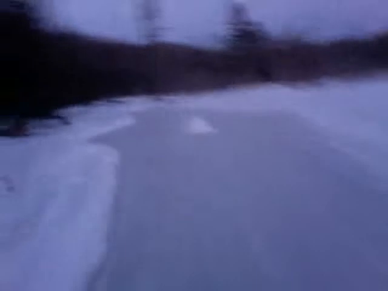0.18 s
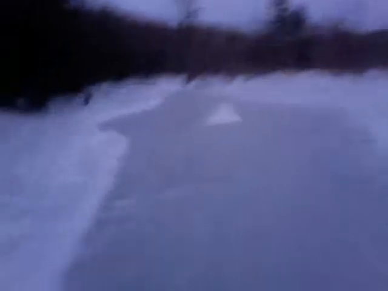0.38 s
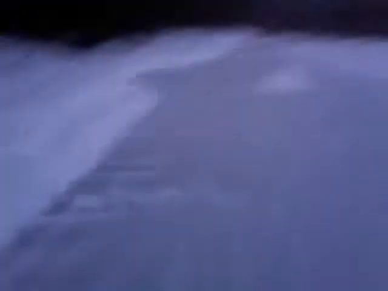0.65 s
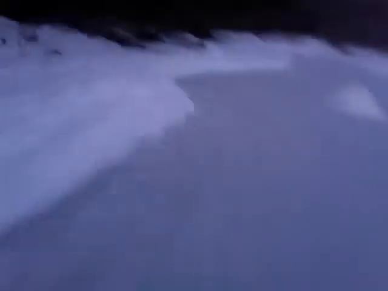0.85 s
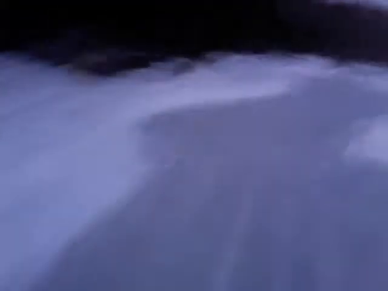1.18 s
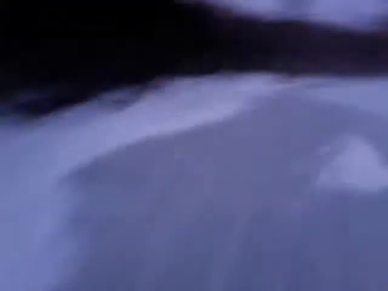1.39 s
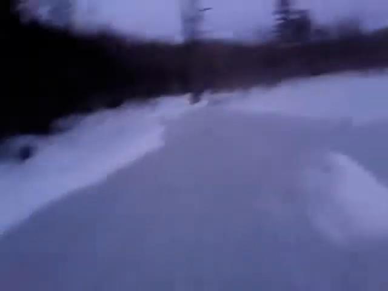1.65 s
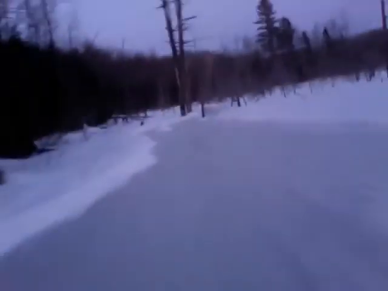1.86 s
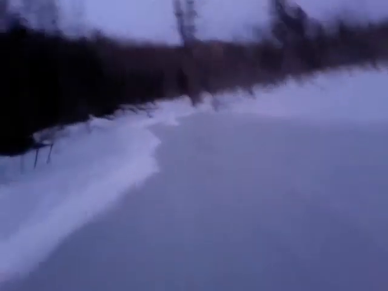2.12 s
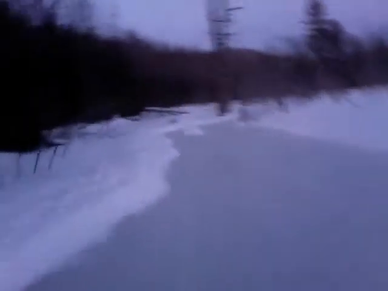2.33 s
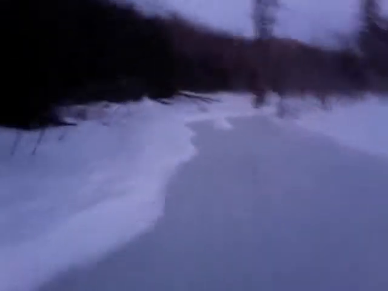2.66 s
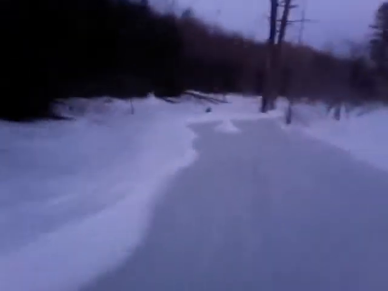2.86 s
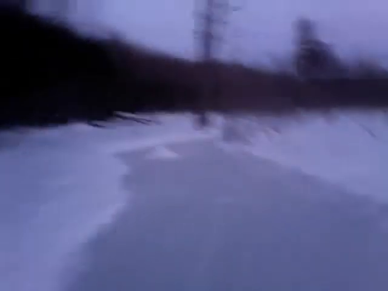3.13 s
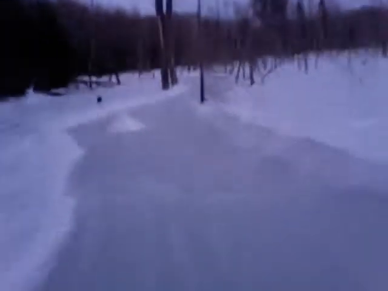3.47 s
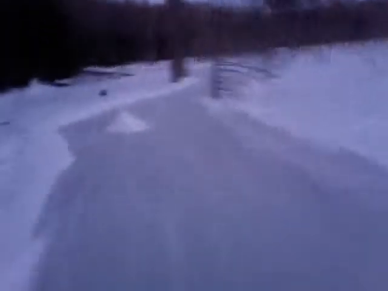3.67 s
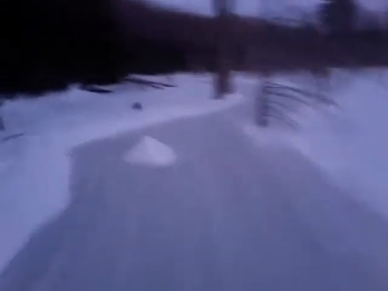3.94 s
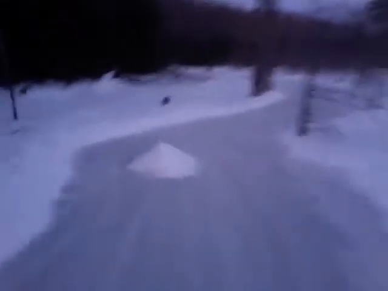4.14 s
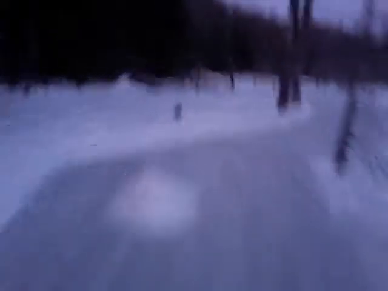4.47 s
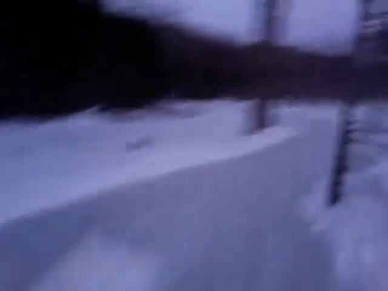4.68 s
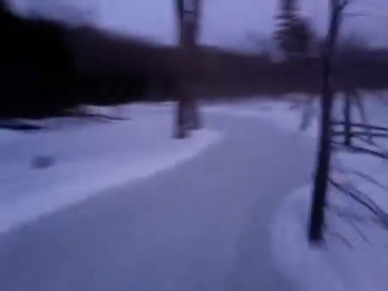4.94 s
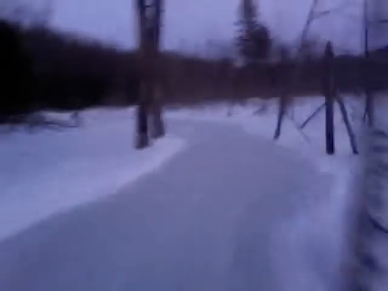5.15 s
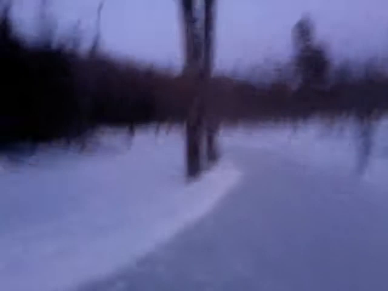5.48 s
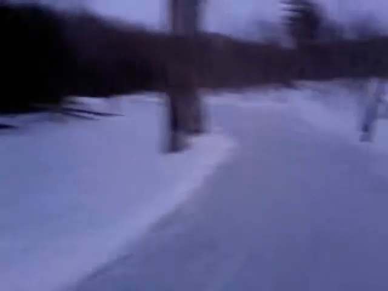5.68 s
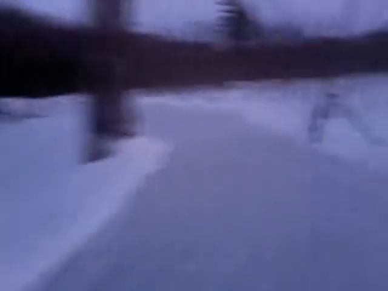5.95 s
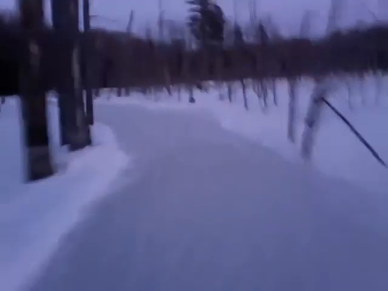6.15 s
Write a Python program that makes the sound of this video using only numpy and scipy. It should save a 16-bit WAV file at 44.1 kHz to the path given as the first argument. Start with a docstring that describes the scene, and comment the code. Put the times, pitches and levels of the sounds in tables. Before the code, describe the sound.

Close, irregular skating strokes grind across bumpy outdoor ice, knocking, crunching and briefly groaning above a thin hiss of loose snow.

```python
"""Rough, snow-dusted pond ice in open air: a skater, close by, on a camera's small microphone.
The blades stick and slip in a dense chatter that each stroke swells or eases, and catch on bumps in short, dry knocks.
Each contact filters noise bursts into a dull, falling thud, a hollow ring mostly at 700-900 Hz,
a crunch of breaking ice and a thin spray of snow. Now and then a juddering edge groans as a pulsing tone,
or a scrape sings in a narrow band. Loose snow hisses evenly below, over a faint hush.
"""
import sys
import numpy as np
from scipy import signal
from scipy.fft import rfft, irfft, next_fast_len
from scipy.io import wavfile
from scipy.ndimage import uniform_filter1d, map_coordinates

SR = 44100
rng = np.random.default_rng(int(sys.argv[2]) if len(sys.argv) > 2 else 0)


def transcribe(signal):
    """Save signal, clipped to [-1, 1], as a 16-bit WAV file at the path in sys.argv[1]."""
    frames = np.atleast_2d(signal).T
    limited = np.clip(frames, -1, 1)
    pcm = np.round(limited * 32767).astype(np.int16)
    wavfile.write(sys.argv[1], SR, pcm)


N = 278271
TIME = np.arange(N) / SR  # t/s


def amp(db):
    """Decibels to gain."""
    return 10 ** (np.asarray(db) / 20)


def unit(x):
    """x at rms 1."""
    return x / np.sqrt(np.mean(x ** 2) + 1e-20)


def steady(x, span):
    """x with its slow level (over span seconds) evened out to rms 1."""
    size = int(span * SR) + 1
    slow_power = uniform_filter1d(uniform_filter1d(x * x, size), size)
    return x / np.sqrt(np.abs(slow_power) + 1e-12)


def response(spectrum, size=2048):
    """The causal, minimum-phase impulse response with this (f/Hz, level/dB) colour."""
    hz, db = np.transpose(spectrum)
    bins_hz = np.fft.rfftfreq(size, 1 / SR)
    gain = amp(np.interp(np.log(bins_hz + 1), np.log(hz), db))
    # folding the cepstrum forward in time puts the energy as early as possible
    cepstrum = irfft(np.log(gain))
    cepstrum[1:size // 2] *= 2
    cepstrum[size // 2 + 1:] = 0
    return irfft(np.exp(rfft(cepstrum)))


def through(x, impulse):
    """x played through an impulse response."""
    return signal.fftconvolve(x, impulse)[:len(x)]


def resonate(x, hz, width_hz):
    """x rings a resonance whose centre may move."""
    t = TIME[:SR // 40]
    carrier = np.exp(2j * np.pi * np.cumsum(hz * np.ones(len(x))) / SR)
    # shift the centre down to 0 Hz, ring there, and shift back up
    ringing = through(x / carrier, t * np.exp(-np.pi * width_hz * t))
    return np.real(carrier * ringing)


def add(track, s, sound):
    """Mix a sound into the track at time s."""
    start = int(np.clip(s * SR, 0, N - 1))
    track[start:start + len(sound)] += sound[:N - start]


def wobble(per_s):
    """A smooth random curve with this many knots a second."""
    return map_coordinates(rng.standard_normal(size=2048), [TIME * per_s], mode="mirror")


def slips(rate, scatter, spread_db, count=2500):
    """Stick and slip: pulses of uneven size at an uneven rate, per second."""
    gap, size = rng.standard_normal((2, count))
    at = (np.cumsum(np.exp(scatter * gap)) / rate * SR).astype(int)
    gains = amp(spread_db * np.clip(size, -2, 2))
    inside = at < N
    return np.bincount(at[inside], gains[inside], N)


def fragments(per_s, spread_db):
    """Ice breaks grain by grain: single snaps of uneven size at random moments."""
    snaps = (rng.random(N) < per_s / SR) * rng.choice([-1, 1], N)
    return unit(snaps * amp(spread_db * np.clip(rng.standard_normal(N), -2, 2)))


def shedding(pulses, life, rub):
    """Each slip sheds a sudden burst that dies over its life (s), over a share of even rubbing."""
    return unit(through(pulses, np.exp(-TIME[:SR // 20] / life))) + rub


def crumble(pulses, life, rub, grains_per_s):
    """The shedding of the slips sets how strongly the ice snaps."""
    return fragments(grains_per_s, spread_db=3.0) * shedding(pulses, life, rub)


def pings(pulses, life, rub, low_hz, high_hz, decay, count):
    """Every shed fragment pings at a pitch of its own and dies away over the decay time (s)."""
    strength = shedding(pulses, life, rub)
    when, pitch, size, phase = rng.random((count, 4)).T[:, :, None]
    at, t = (when * N).astype(int), TIME[:SR // 220]
    hz = low_hz + (high_hz - low_hz) * pitch
    tones = np.exp(-t / decay) * np.sin(2 * np.pi * (hz * t + phase))
    grains = strength[at] * amp(8.8 * size) * tones
    return unit(np.bincount((at + np.arange(len(t))).ravel(), grains.ravel(), N)[:N])


def shifting(x, patchy_db):
    """Resonances come and go as the contact point moves along the blade."""
    z = signal.stft(x, nperseg=512)[2]
    field = rng.standard_normal(z.shape)
    for _ in range(2):
        field = uniform_filter1d(uniform_filter1d(field, size=4, axis=0), size=8, axis=1)
    return signal.istft(z * amp(patchy_db * unit(field)), nperseg=512)[1][:N]


# the ice sheet carries low notes more slowly: travel time (s) at this pitch (Hz)
ICE_TRAVEL_S, ICE_HZ = .003, 338


def disperse(x):
    """Bending waves in the ice run faster with the root of frequency, so a thud falls in pitch."""
    size = next_fast_len(N + SR // 2)
    hz = np.fft.rfftfreq(size, 1 / SR)
    # delay counted from the arrival at ICE_HZ: lower notes later, higher ones sooner
    cycles = ICE_TRAVEL_S * (2 * np.sqrt(ICE_HZ * hz) - hz - ICE_HZ)
    return irfft(rfft(x, size) * np.exp(-2j * np.pi * cycles), size)[:N]


# pushes and scrapes of a blade: (start t/s, end t/s, swell from start to end level/dB, ring f/Hz,
# thud level/dB, ring level/dB, crunch level/dB, spray level/dB)
STROKES = [(0, 0.207, -1.5, 718, -44, -42, -51, -59.5), (0.446, 0.536, -2, 780, -61, -62, -72, -58),
           (0.711, 0.857, 2, 747, -54, -44, -55, -63.5), (0.885, 0.977, 0.5, 825, -50, -29, -43.5, -60.5),
           (0.974, 1.121, -2.5, 880, -47, -33.5, -42, -59),
           (1.216, 1.502, -1.5, 710, -44.5, -41.5, -49, -84),
           (1.557, 1.724, 12.5, 857, -43.5, -35.5, -50.5, -64),
           (1.788, 2.032, 4, 658, -57, -40.5, -47.5, -57.5), (2.577, 2.701, 7, 755, -39, -39.5, -51.5, -80),
           (2.74, 3.075, -1, 850, -48.5, -53.5, -57, -70), (3.368, 3.579, 11.5, 790, -50, -42, -64, -65),
           (3.68, 3.786, 7, 860, -54, -50.5, -58, -80), (4.226, 4.347, 0, 870, -51, -41, -72, -68),
           (4.36, 4.589, -3, 770, -37.5, -39.5, -42.5, -53), (4.833, 4.929, 14, 900, -49, -51, -56, -78),
           (5.025, 5.143, -5.5, 870, -37.5, -33.5, -47.5, -57),
           (5.197, 5.343, 0.5, 880, -47, -44, -51, -57.5), (5.52, 5.708, 9, 846, -40, -41, -50, -56),
           (5.922, 6.006, 2, 855, -35, -29, -51.5, -54.5), (6.035, 6.127, 1, 854, -44, -37, -42, -55.5)]
# how strongly the blades coast between strokes: (t/s, level/dB on top of the coasting levels)
COAST = [(0, 5), (1.2, 12), (2.1, 9), (2.4, 6.5), (2.9, 8), (3.25, 1.5), (3.8, 9), (4.1, 2.5), (4.75, 9.5),
         (5.4, 5.5), (6.2, 7.5), (6.3, 8)]
# base levels of coasting: (thud level/dB, ring level/dB, crunch level/dB, spray level/dB)
COAST_LEVELS = (-58, -57.5, -64, -74)
STROKE_ATTACK_S, STROKE_RELEASE_S = 0.013, 0.038


def pressure():
    """Levels (dB) of the four parts: each stroke bites, swells or eases, and lifts, over the coasting."""
    coast_db = np.interp(TIME, *np.transpose(COAST))
    power = amp(np.array(COAST_LEVELS)[:, None] + coast_db) ** 2
    for start, end, swell_db, _, *levels in STROKES:
        corners = [start - STROKE_ATTACK_S, start, end, end + STROKE_RELEASE_S]
        gate = np.interp(TIME, corners, [0, 1, 1, 0])
        on = gate > 0
        swell = amp(swell_db * np.interp(TIME[on], [start, end], [-.5, .5]))
        power[:, on] += (amp(levels)[:, None] * gate[on] * swell) ** 2
    return 10 * np.log10(power)


RING_WANDER_HZ, WANDER_PER_S = 40, 12  # scale of the wander, and its knots a second


def ring_pitch():
    """Each stroke has its own hollow ring, which wanders as the load on the blade shifts."""
    start, end, _, hz, *_ = np.transpose(STROKES)
    return np.interp(TIME, (start + end) / 2, hz) + RING_WANDER_HZ * wobble(WANDER_PER_S)


# colour of a contact's dull thud: (f/Hz, level/dB per Hz)
THUD_COLOUR = [(25, -52.5), (50, -55.5), (80, -18.5), (130, -5), (240, 2.5), (330, 2.5), (450, 4.5),
               (560, -7), (750, -42), (1500, -24.5), (4000, -71.5)]
KNOCKS_PER_S, KNOCK_SOFT_S = 36, 0.00076  # soft knocks of the uneven ice, and their decay
THUD_GRIT = 2.6  # grit that pressure adds, against the knocks


def glide_thud(pulses, rub):
    """Uneven ice knocks softly from below, and pressure grinds grit into the same dull body."""
    knocks = slips(rate=KNOCKS_PER_S, scatter=.35, spread_db=7)
    knocks = through(knocks, np.exp(-TIME[:SR // 100] / KNOCK_SOFT_S))
    grit = crumble(pulses, life=0.0065, rub=.5 * rub, grains_per_s=4000)
    body = response(THUD_COLOUR)
    return disperse(unit(through(knocks, body)) + THUD_GRIT * rub * unit(through(grit, body)))


# colour of a contact's hollow ring: (f/Hz, level/dB per Hz)
RING_COLOUR = [(100, -27), (420, 4), (540, -5), (640, 3), (880, 5), (1060, 7.5), (1230, 2), (1450, 2.5),
               (2000, -20.5), (5000, -37), (15000, -95)]
RING_LIFE_S = 0.0077  # decay of a slip's burst
RING_BROADENS = 0.62  # a pressed blade roars on both sides of its ring


def glide_ring(pulses, rub, hopping_hz):
    """The slips ring the hollow resonance, and pressure adds a broad roar around it."""
    chatter = crumble(pulses, life=RING_LIFE_S, rub=1.14 * rub, grains_per_s=3000)
    hollow = resonate(shifting(chatter, patchy_db=4.5), hopping_hz, width_hz=290)
    roar = crumble(pulses, life=RING_LIFE_S, rub=2 * rub, grains_per_s=3000)
    body = response(RING_COLOUR)
    return unit(through(hollow, body)) + RING_BROADENS * rub * unit(through(roar, body))


# colour of a contact's breaking ice: (f/Hz, level/dB per Hz)
CRUNCH_COLOUR = [(300, -52), (900, 0), (1350, 8.5), (1850, 8.5), (2200, 2), (2900, 3), (3700, -7),
                 (4500, -24), (5300, -26), (8000, -57)]


def glide_crunch(pulses, rub):
    """Each slip breaks off ice fragments that ping from 900 to 4600 Hz."""
    chips = pings(pulses, life=0.0071, rub=.6 * rub + 0.17, low_hz=900, high_hz=4600, decay=.0007, count=14000)
    return through(shifting(chips, patchy_db=3.5), response(CRUNCH_COLOUR))


# colour of a contact's thrown snow: (f/Hz, level/dB per Hz)
SPRAY_COLOUR = [(1500, -29), (4000, 3.5), (5000, 1), (6200, -3.5), (7600, -5), (9300, -10.5),
                (10500, -14.5), (12000, -18.5), (15500, -51)]


def glide_spray(pulses, rub):
    """Each slip throws snow crystals that ping from 2800 to 15000 Hz."""
    flakes = pings(pulses, life=0.0075, rub=.5 * rub + 0.17, low_hz=2800, high_hz=15000, decay=.0006, count=24000)
    return through(shifting(flakes, patchy_db=5), response(SPRAY_COLOUR))


# ring level (dB) at which the rub share reaches 1, and its growth in dB per dB of ring
FULL_RUB_DB, RUB_GROWTH = -22, 0.45
RING_HOP_HZ = 74  # the ring jumps by about this much from slip to slip


def glide(pulses, levels, ring_hz):
    """The chatter of the running blades drives all four parts, as hard as the stroke presses."""
    thud_db, ring_db, crunch_db, spray_db = levels
    # a light blade ticks; a pressed blade scrapes without a pause
    rub = np.minimum(amp(RUB_GROWTH * (ring_db - FULL_RUB_DB)), 1.2)
    # every firm slip lands on a new spot, with a slightly different ring
    hop_hz = RING_HOP_HZ * rng.standard_normal(N)[np.cumsum(pulses > .5)]
    thud = amp(thud_db) * steady(glide_thud(pulses, rub), 0.036)
    ring = amp(ring_db) * steady(glide_ring(pulses, rub, ring_hz + hop_hz), 0.034)
    crunch = amp(crunch_db) * steady(glide_crunch(pulses, rub), 0.031)
    spray = amp(spray_db) * steady(glide_spray(pulses, rub), 0.055)
    return thud + ring + crunch + spray


# a scraping edge sings or groans in a narrow, drifting band:
# (start t/s, end t/s, first f/Hz, last f/Hz, level/dB); none is shorter than 0.01 s
SINGS = [(0, 0.19, 8800, 8800, -66), (0, 0.23, 2490, 2580, -53), (.1, 0.253, 11200, 10600, -70),
         (0.42, 0.53, 5840, 5750, -61), (0.658, 0.664, 5850, 5630, -45), (0.835, 0.856, 7640, 7200, -49.5),
         (.89, 0.977, 623, 660, -30.5), (1.25, 1.317, 5200, 5070, -55), (1.628, 1.656, 7960, 7560, -53.5),
         (2.344, 2.52, 1830, 1650, -51), (2.504, 2.716, 1770, 1700, -40.5), (2.556, 2.62, 6940, 6560, -58),
         (2.768, 2.879, 3330, 3400, -52.5), (2.982, 3.133, 2700, 3620, -55.5),
         (3.517, 3.577, 6800, 7000, -60), (3.836, 3.88, 177, 175, -38.5), (3.948, 4.01, 9200, 8800, -68),
         (4.293, 4.372, 7260, 7440, -63.5), (4.372, 4.464, 3300, 3650, -56), (4.39, 4.583, 2580, 2800, -70),
         (5.02, 5.16, 3700, 3770, -52.5), (5.024, 5.156, 7960, 8300, -62), (5.92, 6.05, 2700, 2550, -62),
         (5.953, 6.173, 4900, 4820, -54), (6.163, 6.2, 9250, 8750, -58)]


def singing(pulses):
    """For part of a stroke the chatter feeds one resonance of blade or ice."""
    track = np.zeros(N)
    friction = crumble(pulses, life=0.0025, rub=0.18, grains_per_s=6700)
    for start, end, first_hz, last_hz, db in SINGS:
        scrape = friction[int(max(start, 0) * SR):][:int(max(end - start, .01) * SR)]
        width_hz = min(60 + .15 * first_hz, 400)
        tone = resonate(scrape, np.linspace(first_hz, last_hz, len(scrape)), width_hz)
        add(track, start, amp(db) * steady(tone, 0.033) * signal.windows.tukey(len(tone), .3))
    return track


# colour of the even hiss of loose snow: (f/Hz, level/dB per Hz)
POWDER_COLOUR = [(1500, 2), (4000, -4), (6000, -4.5), (8000, -14), (10000, -22), (15000, -24)]
POWDER_DB, POWDER_FOLLOWS = -72, 0.9  # base level, and dB gained per dB of coasting


def powder():
    """Loose snow hisses evenly under the running blades, between the strokes too."""
    hiss = unit(through(rng.standard_normal(N), response(POWDER_COLOUR)))
    return hiss * amp(POWDER_DB + POWDER_FOLLOWS * np.interp(TIME, *np.transpose(COAST)))


def open_air():
    """Filtered noise lies under everything as a faint, mostly low hush."""
    colour = [(25, -4.5), (200, 20.5), (900, -2.5), (3000, 0.5), (9000, -29.5), (15000, -65)]  # f/Hz, level/dB
    return amp(-57) * unit(through(rng.standard_normal(N), response(colour)))


# the edge catches on a bump, levels as rms over 10 ms before the closing filters:
# (t/s, contact length/s, at least 0.001, chip f/Hz, thud level/dB, ring level/dB, crunch level/dB)
CATCHES = [(.008, 0.0026, 2610, -39.5, -37, -43), (.025, 0.01, 2600, -50, -38, -44.5),
           (.052, 0.018, 1820, -33.5, -29.5, -45), (.087, 0.0061, 1820, -32.5, -44, -43),
           (.175, 0.0099, 2640, -38.5, -33, -40), (.294, 0.0041, 1800, -45.5, -63, -62),
           (.395, 0.0032, 2600, -41, -67, -50), (.43, .003, 2320, -42, -57, -52),
           (.457, 0.0023, 5800, -38.5, -57, -49), (.661, 0.0041, 3100, -37, -30.5, -40.5),
           (.689, 0.012, 1350, -65, -26, -41), (.719, 0.0031, 1800, -58, -32, -39.5),
           (.731, 0.0049, 2440, -66, -33, -39), (.75, 0.0092, 2540, -57, -28.5, -45),
           (.782, 0.013, 1770, -67, -29, -39.5), (.841, 0.012, 1350, -39, -21.5, -34.5),
           (.797, 0.0026, 2320, -54, -34, -45), (.822, 0.018, 2600, -43, -27, -55),
           (.883, 0.0061, 1900, -49, -39, -37.5), (.9, .003, 1500, -48, -36, -53),
           (.919, 0.0033, 1900, -44, -36, -46), (.942, 0.0033, 1450, -45, -39, -35),
           (.96, 0.003, 1940, -48, -33, -35.5), (.985, .003, 1360, -46, -35, -40),
           (1.001, 0.0045, 3120, -53, -33, -41), (1.034, 0.0038, 3900, -51, -25, -43),
           (1.054, 0.0026, 1400, -42, -32, -46), (1.112, 0.0023, 1870, -42, -30, -42),
           (1.085, 0.0021, 2000, -35, -32, -34.5), (1.094, 0.0091, 2000, -34.5, -34, -36.5),
           (1.185, 0.0053, 3130, -36, -45, -36.5), (1.307, 0.012, 1860, -35, -31, -35.5),
           (1.34, 0.0057, 1790, -42, -33.5, -44), (1.376, 0.0033, 1490, -48, -40, -61),
           (1.397, 0.0054, 3030, -33.5, -51, -66), (1.448, 0.0035, 1310, -40, -49, -57),
           (1.421, 0.0015, 1810, -21, -35.5, -59), (1.483, 0.0025, 3170, -35, -35, -48),
           (1.522, 0.013, 2650, -42, -29.5, -44), (1.636, 0.01, 1410, -35, -25, -32.5),
           (1.707, 0.014, 1470, -24, -33.5, -33), (1.803, 0.0028, 1640, -46, -41, -41.5),
           (1.83, 0.0051, 1680, -60, -29.5, -62), (1.844, 0.00076, 2240, -62, -33, -43),
           (1.89, 0.0078, 6610, -60, -31, -49), (1.912, 0.019, 2400, -55, -28, -38.5),
           (1.981, 0.0046, 2310, -40, -34, -43), (2.004, 0.0026, 3100, -36, -47, -54),
           (2.018, 0.0041, 2690, -26.5, -24.5, -35), (2.028, 0.0042, 4050, -58, -23, -47),
           (2.066, 0.0048, 1870, -48, -38, -51), (2.078, 0.003, 3170, -43, -52, -56),
           (2.177, 0.0047, 1890, -42, -42, -48.5), (2.195, 0.0044, 1810, -58, -40, -58),
           (2.22, 0.0031, 2030, -40, -28.5, -34.5), (2.345, 0.0048, 1780, -54, -40.5, -42.5),
           (2.361, .004, 1820, -55, -44, -53), (2.473, 0.0082, 1740, -37.5, -50, -57),
           (2.485, 0.004, 1740, -55, -41, -46), (2.515, 0.0045, 1670, -34, -35, -39),
           (2.531, 0.0033, 1770, -47, -34.5, -42.5), (2.55, .003, 1680, -41, -32.5, -51),
           (2.567, 0.0027, 2110, -38, -34, -33.5), (2.622, 0.0028, 1590, -40, -51, -34),
           (2.644, 0.0049, 1600, -37, -35.5, -33), (2.663, 0.007, 1720, -42, -28.5, -45),
           (2.693, 0.0031, 1780, -32, -42, -47), (2.77, 0.0045, 3250, -37.5, -45, -45),
           (2.835, 0.0037, 1750, -52, -55, -61), (2.867, 0.0059, 3420, -35, -67, -47.5),
           (2.911, 0.0037, 2200, -31.5, -36.5, -43.5), (2.957, 0.0035, 2940, -33.5, -37.5, -45.5),
           (2.974, 0.0014, 3660, -38, -47, -52), (2.987, 0.0027, 2700, -38, -59, -44),
           (3.003, 0.015, 2670, -54, -35, -47), (3.033, 0.025, 2650, -34.5, -36, -44),
           (3.169, 0.0024, 3470, -41, -49.5, -59), (3.213, .002, 1800, -43.5, -62, -70),
           (3.277, 0.0034, 1520, -47, -51, -47.5), (3.326, .003, 1800, -46, -52, -65),
           (3.367, 0.012, 1490, -42, -43, -58), (3.392, 0.0043, 3790, -43, -37, -64),
           (3.465, 0.0021, 2200, -38, -39, -45), (3.515, 0.0089, 1420, -69, -30.5, -57),
           (3.555, 0.0017, 1310, -60, -33, -48), (3.608, 0.0059, 2650, -49, -45, -47),
           (3.65, 0.003, 3380, -40.5, -56, -59), (3.678, 0.006, 1500, -55, -38.5, -52),
           (3.713, 0.0049, 4250, -66, -41, -54.5), (3.754, 0.0033, 3570, -47, -31.5, -51),
           (3.775, 0.0054, 1630, -50, -44, -55), (3.881, 0.0042, 2790, -36, -26, -43),
           (3.901, .003, 1310, -54, -39.5, -62), (3.96, 0.0042, 5100, -44, -48, -55),
           (3.98, 0.012, 1630, -36.5, -41, -43), (4.007, 0.0045, 1370, -32, -26.5, -42.5),
           (4.188, 0.0049, 1860, -34, -46, -49.5), (4.209, 0.0074, 1620, -32.5, -30.5, -41),
           (4.228, 0.0066, 1480, -46, -32, -38.5), (4.279, 0.01, 1720, -40, -47, -51),
           (4.34, 0.0095, 1960, -49, -32, -51), (4.354, 0.0058, 1430, -36, -26, -40),
           (4.391, 0.0089, 4070, -52, -29, -43), (4.408, 0.0019, 2720, -43, -38, -38),
           (4.429, 0.0027, 3450, -26.5, -26, -37.5), (4.461, 0.00091, 1550, -22, -38, -41),
           (4.484, 0.0039, 1500, -32, -47, -60), (4.498, 0.0035, 4070, -39, -35, -43),
           (4.505, 0.00092, 1470, -31.5, -39, -32.5), (4.508, 0.0038, 3870, -20.5, -30, -37.5),
           (4.536, 0.0036, 1450, -24.5, -30, -32.5), (4.546, 0.0134, 1550, -31, -27, -35),
           (4.561, 0.0025, 5200, -33, -26, -45), (4.584, 0.0018, 3460, -31, -30, -38.5),
           (4.602, 0.0057, 2690, -28, -50, -51), (4.626, 0.0042, 1480, -19, -25.5, -39),
           (4.653, 0.003, 3070, -32, -31, -47), (4.66, 0.0035, 1570, -28.5, -30, -37.5),
           (4.688, 0.0084, 3230, -33, -28.5, -42), (4.741, .003, 1830, -44, -52, -58),
           (4.818, 0.018, 2780, -57, -45, -45.5), (4.862, 0.0086, 1710, -38.5, -35, -40),
           (4.903, 0.0044, 1700, -24, -28.5, -38), (4.957, 0.0038, 1850, -26.5, -39, -44),
           (4.992, 0.004, 1760, -30, -36, -41.5), (5.007, 0.0022, 1790, -33, -35, -33.5),
           (5.029, 0.0061, 1630, -31, -23, -37.5), (5.071, 0.0012, 1380, -30.5, -25, -48),
           (5.108, 0.0037, 3920, -30, -25.5, -55), (5.173, 0.0059, 2460, -26.5, -44, -46),
           (5.197, 0.0048, 2600, -32, -33.5, -48), (5.22, 0.013, 4760, -59, -26.5, -52),
           (5.259, 0.0054, 1400, -48, -32, -44), (5.271, 0.004, 1430, -33.5, -23, -30),
           (5.3, 0.0066, 1460, -27.5, -29.5, -46), (5.342, 0.0093, 2880, -35.5, -32, -41),
           (5.438, 0.0047, 1570, -34, -27.5, -40), (5.458, 0.012, 1700, -28, -39, -53),
           (5.473, 0.0064, 2280, -27.5, -33, -38.5), (5.49, 0.0045, 2750, -41, -24.5, -39),
           (5.512, 0.011, 1500, -41, -25, -37.5), (5.53, 0.006, 1470, -22.5, -25.5, -51),
           (5.54, .003, 4770, -43, -34, -48), (5.564, 0.0012, 2200, -26.5, -33, -64),
           (5.59, 0.0029, 1400, -30, -45, -39), (5.619, 0.0093, 4870, -44, -28, -60),
           (5.603, 0.0088, 1420, -23, -29, -42), (5.645, 0.009, 4900, -33, -25, -45),
           (5.653, 0.0043, 2620, -26, -33, -40.5), (5.694, 0.002, 3570, -23, -20.5, -40.5),
           (5.794, 0.0058, 1800, -27, -24.5, -36.5), (5.813, 0.0071, 1780, -34, -37, -34.5),
           (5.828, 0.0041, 1850, -39, -40, -52), (5.861, 0.0049, 2520, -40, -39, -39),
           (5.898, 0.0095, 3000, -42, -25.5, -43), (5.964, 0.0035, 1880, -28.5, -26.5, -38),
           (5.989, 0.0064, 2730, -47, -39, -36), (6.028, 0.0033, 1710, -47, -28.5, -35),
           (6.043, 0.0016, 1530, -40, -31, -40.5), (6.078, 0.0066, 1900, -27.5, -20, -38),
           (6.1, 0.0031, 1560, -29.5, -24, -31.5), (6.107, 0.00089, 1610, -25, -23, -42),
           (6.159, 0.0033, 3500, -48, -28.5, -40), (6.177, 0.0038, 2820, -49, -34.5, -37.5),
           (6.227, 0.0026, 1450, -32.5, -34.5, -55), (6.249, 0.00071, 2740, -29, -43, -53),
           (6.262, 0.0029, 2740, -48, -46, -38)]
SPRAY_DB, SPRAY_SCATTER_DB = -13, 5.5  # base level of thrown snow against the crunch, and its scatter
SPRAY_FOLLOWS = 0.66  # a catch throws more where the running blade sprays more
CRACK_TOP_HZ = 8650  # a catch is duller than the spray of a running blade


def catches(levels, ring_hz):
    """The edge cracks through a bump, a chip pings, the body rings, and the weight lands a moment later."""
    knocks, thuds, t = np.zeros(N), np.zeros(N), TIME[:SR // 20]
    snow_db = SPRAY_FOLLOWS * (levels[3] - levels[2])
    to_ten_ms = np.sqrt(SR // 100 / len(t))  # rms over the whole knock to rms over 10 ms
    colours = THUD_COLOUR, RING_COLOUR, CRUNCH_COLOUR, SPRAY_COLOUR
    thud_body, ring_body, crunch_body, spray_body = map(response, colours)
    for s, length, chip_hz, thud_db, ring_db, crunch_db in CATCHES:
        grit = rng.standard_normal((4, len(t)))
        glint_hz = rng.uniform(3600, 6600)
        spray_db = crunch_db + SPRAY_DB + np.interp(s, TIME, snow_db)
        spray_db += SPRAY_SCATTER_DB * rng.standard_normal()
        length = max(length, .001)
        contact = (1 - np.exp(-t / 0.00017)) / (1 + (t / (1.47 * length)) ** 4)
        # the first instant of the break is the sharpest
        crack = contact * (1 + 2.5 * np.exp(-t / .0012))

        # the lighter the landing, the softer and deeper its push
        softness = min(0.00039 * amp(-.5 * (thud_db + 31.0)), .002)
        push = -np.exp(-((t - 0.267 * length - softness) / softness) ** 2)
        thud = through(unit(push) + 1.7 * unit(grit[0] * contact), thud_body)

        ring = resonate(grit[1] * crack, np.interp(s, TIME, ring_hz), width_hz=355)
        ring = through(ring, ring_body)
        chip = resonate(grit[3] * crack, chip_hz, width_hz=260)
        crunch = unit(through(grit[2] * crack, crunch_body)) + 1.22 * unit(chip)
        glint = resonate(grit[2] * contact, glint_hz, width_hz=800)
        spray = unit(through(grit[3] * crack, spray_body)) + .7 * unit(glint)

        knock = amp(ring_db) * unit(ring) + amp(crunch_db) * unit(crunch) + amp(spray_db) * unit(spray)
        add(knocks, s, knock * to_ten_ms)
        add(thuds, s, amp(thud_db) * unit(thud) * to_ten_ms)
    dull = signal.butter(2, CRACK_TOP_HZ, fs=SR, output="sos")
    return signal.sosfilt(dull, knocks) + disperse(thuds)


# the edge judders and drives the hollow ring into a clean, pulsing groan:
# (start t/s, end t/s, first f/Hz, last f/Hz, level/dB); none is shorter than 0.01 s
GROANS = [(0.471, 0.524, 792, 788, -43.5), (.75, .835, 772, 785, -36), (1.065, 1.082, 740, 780, -29.5),
          (3.384, 3.462, 856, 922, -39.5), (3.678, 3.735, 749, 740, -43.5), (4.225, 4.241, 970, 1000, -29),
          (4.277, 4.288, 734, 730, -30.5), (4.292, 4.323, 857, 734, -31.5), (5.024, 5.146, 974, 922, -35.5),
          (5.218, 5.242, 815, 1000, -36)]
JUDDER_PER_S, JUDDER_DEPTH, JUDDER_SCATTER = 68.5, 0.82, 0.087  # typical pulse rate, depth, unevenness
GROAN_WAVER_HZ = 16  # scale of the pitch waver


def groaning():
    """A juddering edge feeds the hollow ring in quick, rounded pulses."""
    track = np.zeros(N)
    waver_hz = GROAN_WAVER_HZ * wobble(per_s=90)
    judder = JUDDER_PER_S * np.exp(JUDDER_SCATTER * wobble(per_s=50))
    for start, end, first_hz, last_hz, db in GROANS:
        on = (TIME >= start) & (TIME < max(end, start + .01))
        hz = np.linspace(first_hz, last_hz, on.sum()) + waver_hz[on]
        pulsing = 1 - JUDDER_DEPTH * np.cos(2 * np.pi * np.cumsum(judder[on]) / SR)
        tone = np.sin(2 * np.pi * np.cumsum(hz) / SR)
        tone = tone * pulsing * signal.windows.tukey(len(hz), .3)
        add(track, start, amp(db) * unit(tone))
    return track


def scene():
    """Coarse and fine slips of both skates close by, with no walls to answer, over a faint hush."""
    coarse = slips(rate=56, scatter=.33, spread_db=7.5)
    fine = slips(rate=170, scatter=.7, spread_db=5)
    pulses = coarse + amp(-7.5) * fine
    hush = open_air()
    levels, ring_hz = pressure(), ring_pitch()
    running = glide(pulses, levels, ring_hz) + singing(pulses)
    blades = running + groaning() + catches(levels, ring_hz) + powder()
    return (blades + hush)[None]


TOP_HZ = 15700  # band limit of the camera


def record(dry):
    """The small microphone loses the deep bass, and the camera keeps nothing above its band limit."""
    low_cut = signal.butter(2, 70, "high", fs=SR, output="sos")  # 70 Hz
    thin = signal.sosfilt(low_cut, dry)
    size = next_fast_len(N + SR // 2)
    kept = np.fft.rfftfreq(size, 1 / SR) < TOP_HZ
    return irfft(rfft(thin, size) * kept, size)[..., :N]


dry = scene()
out = record(dry)
transcribe(out)
```